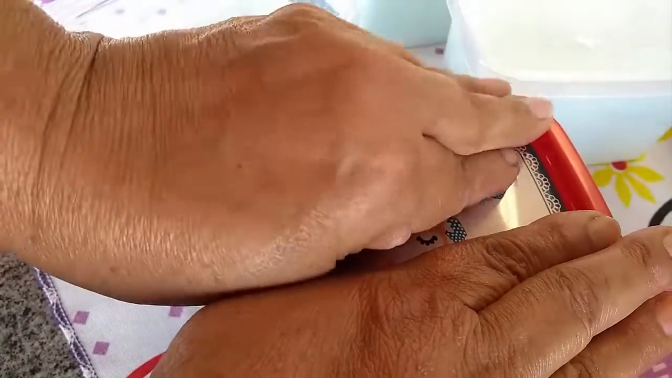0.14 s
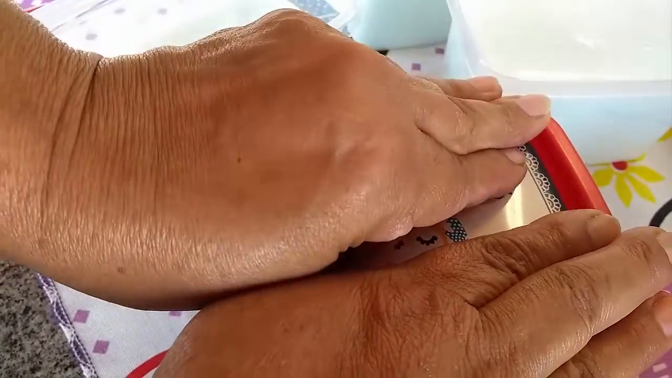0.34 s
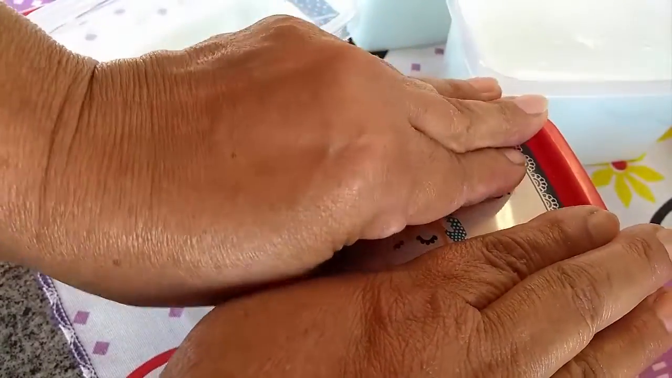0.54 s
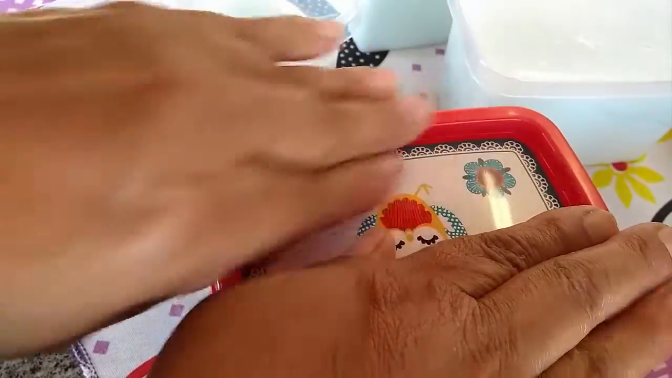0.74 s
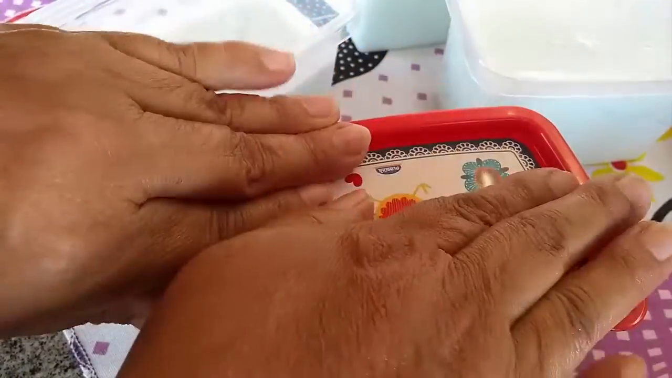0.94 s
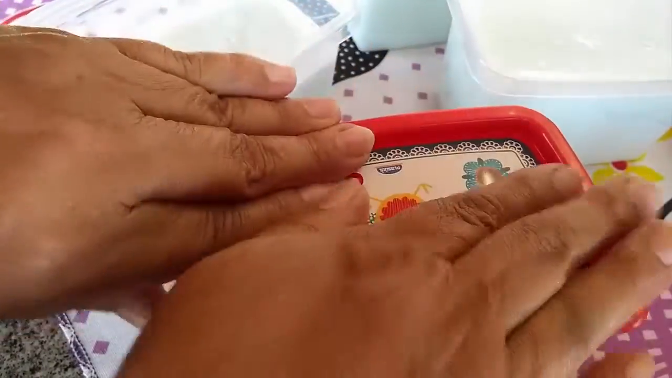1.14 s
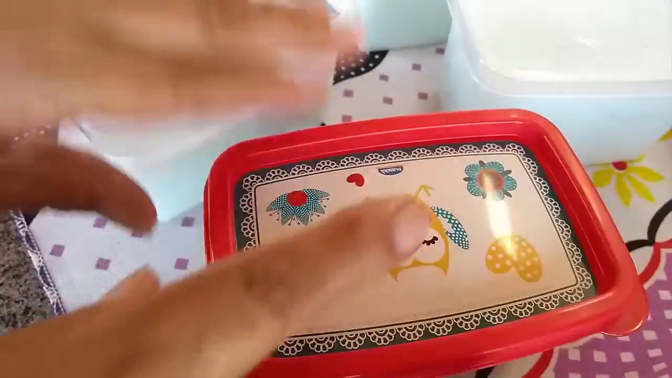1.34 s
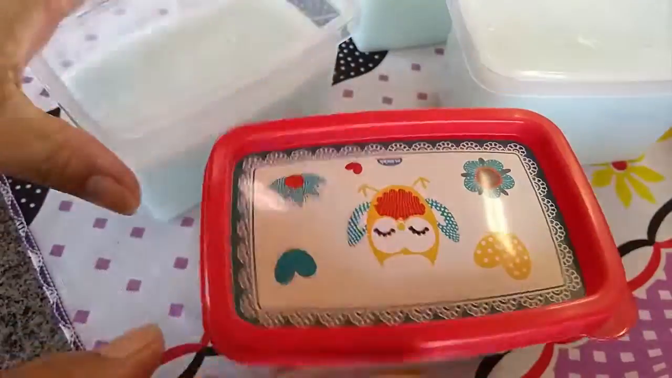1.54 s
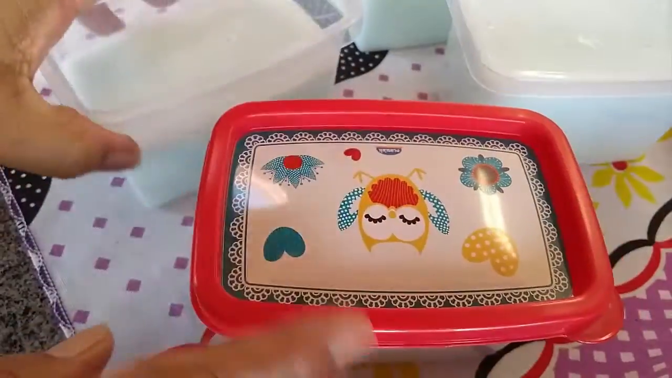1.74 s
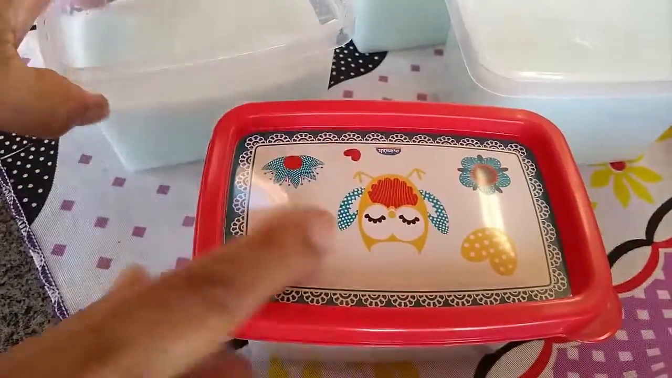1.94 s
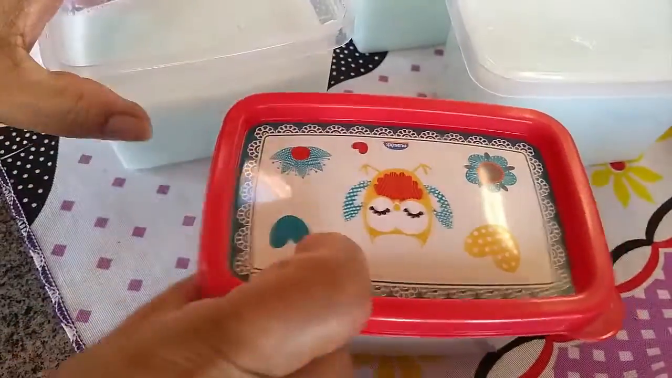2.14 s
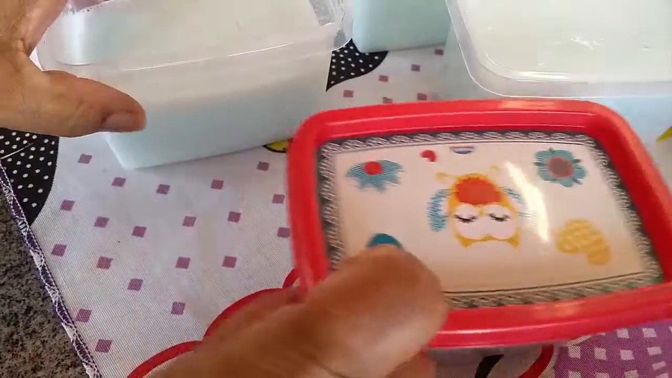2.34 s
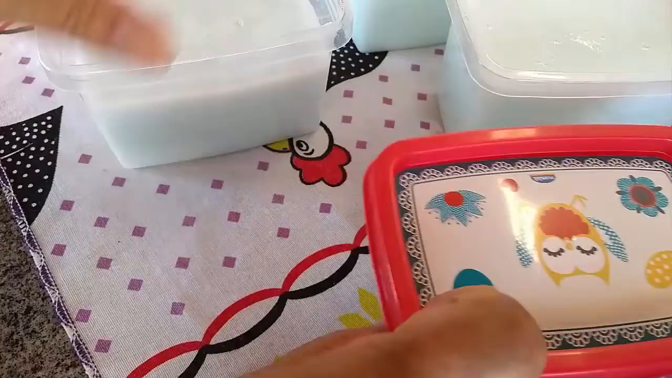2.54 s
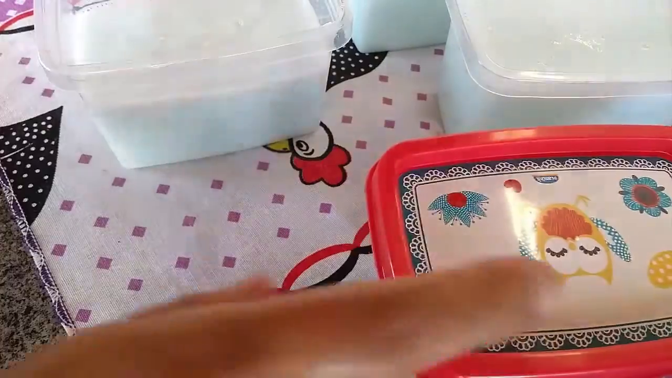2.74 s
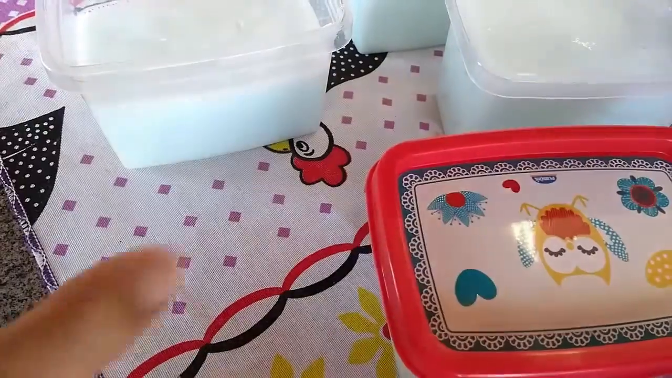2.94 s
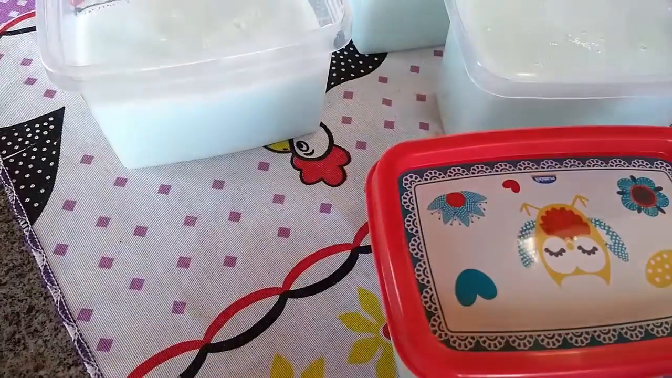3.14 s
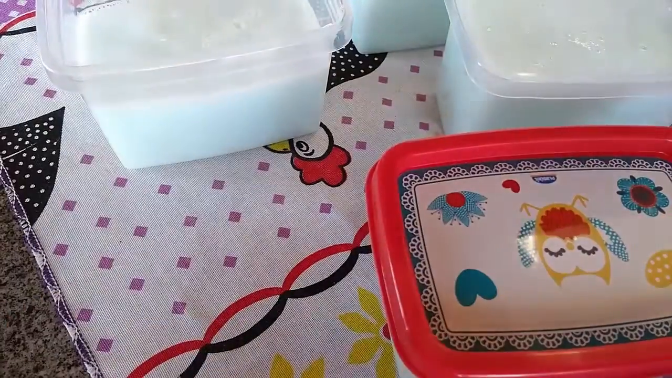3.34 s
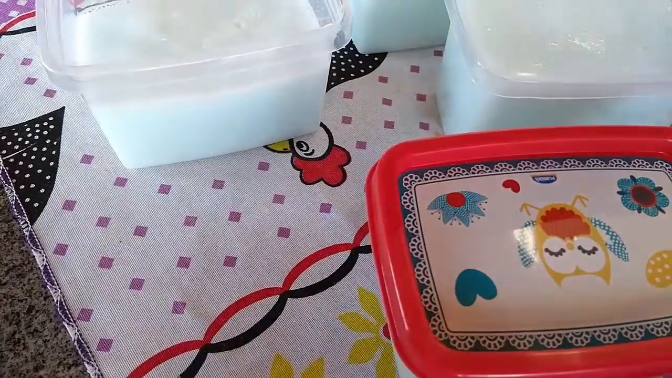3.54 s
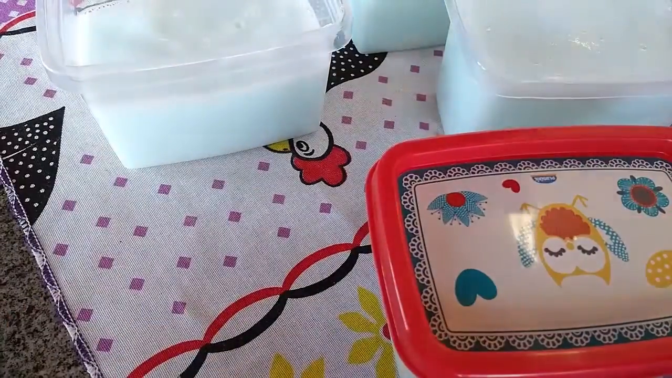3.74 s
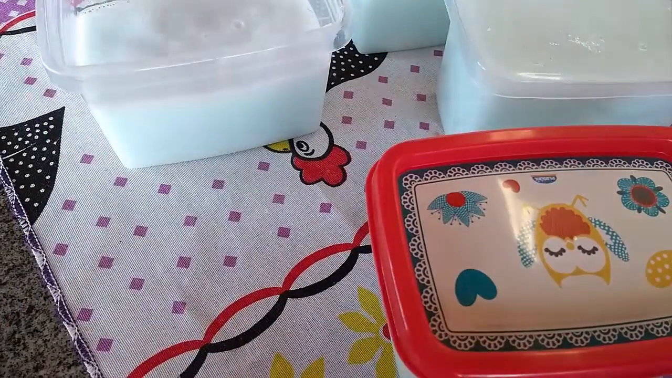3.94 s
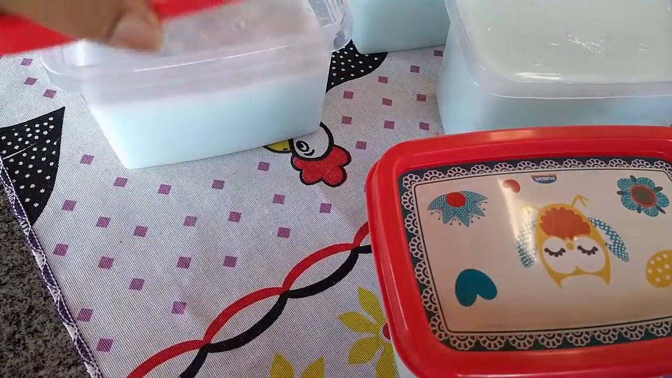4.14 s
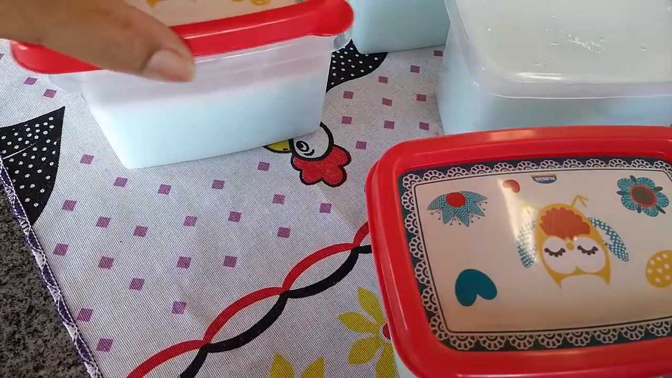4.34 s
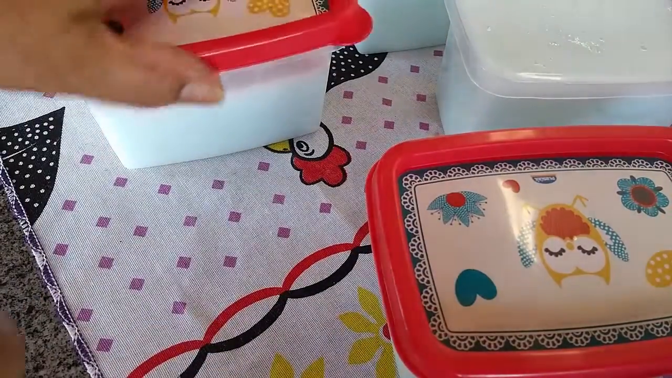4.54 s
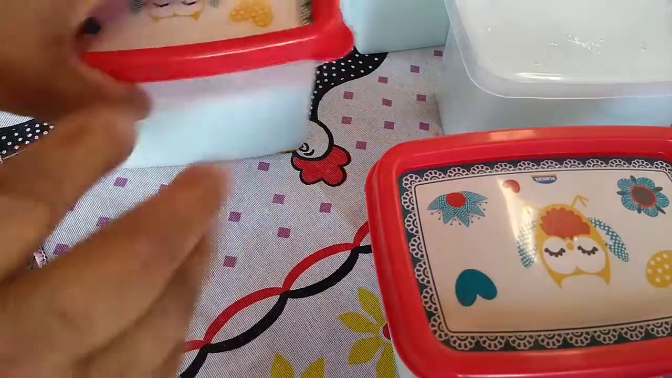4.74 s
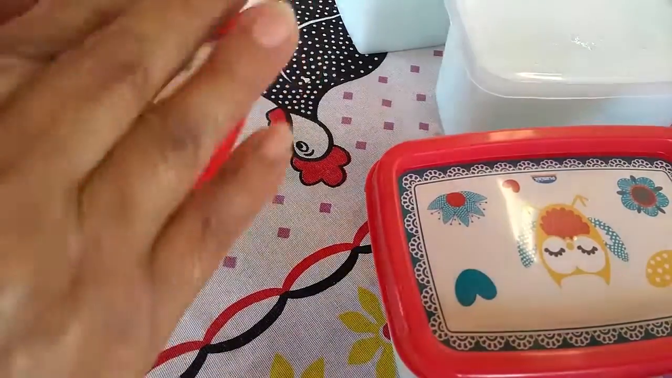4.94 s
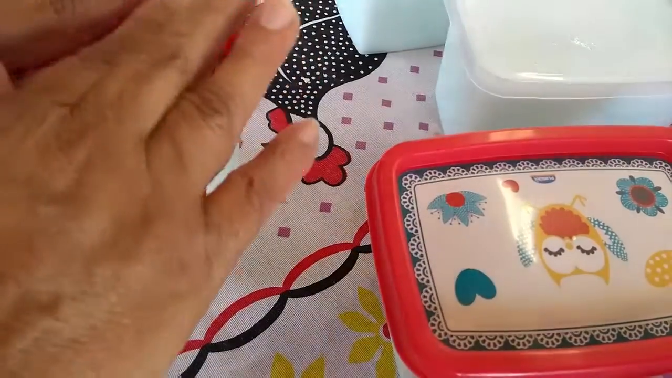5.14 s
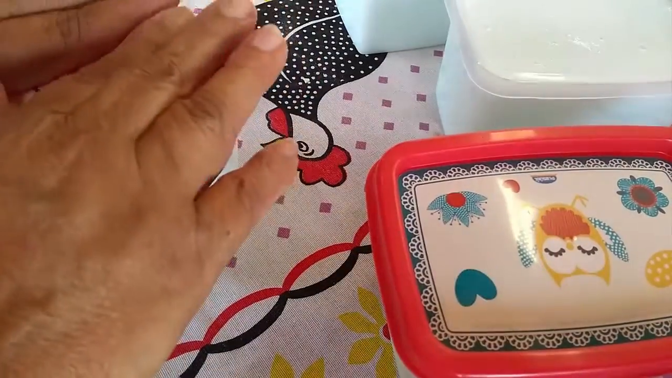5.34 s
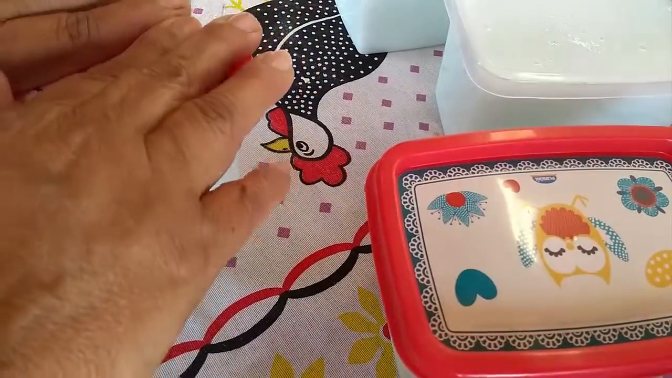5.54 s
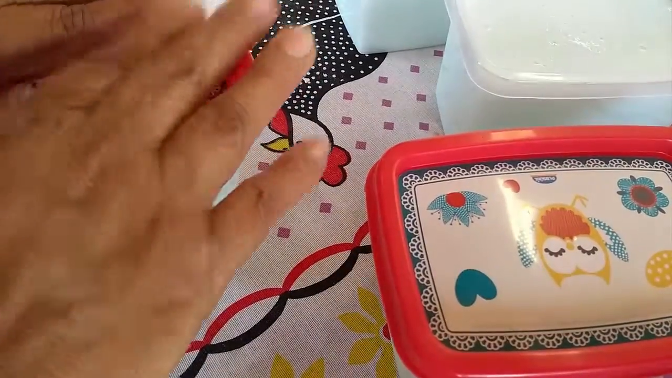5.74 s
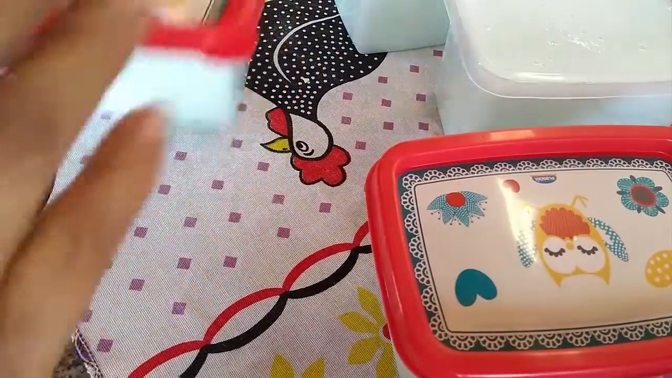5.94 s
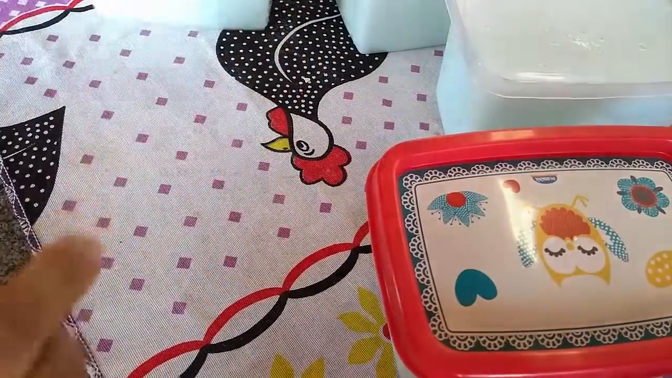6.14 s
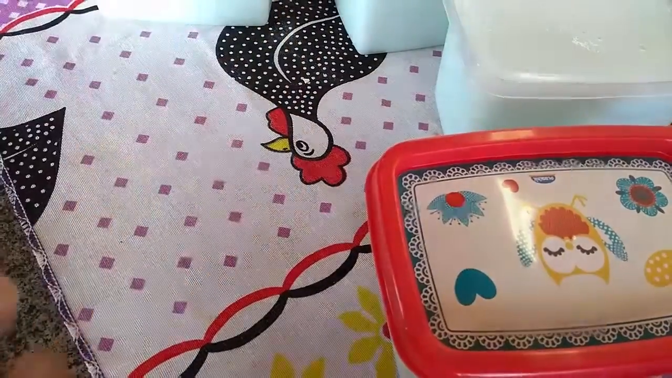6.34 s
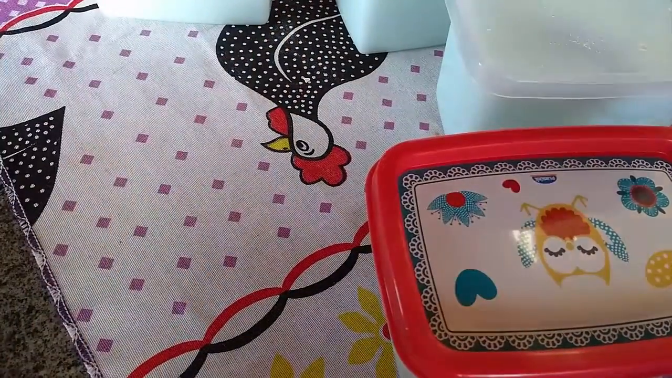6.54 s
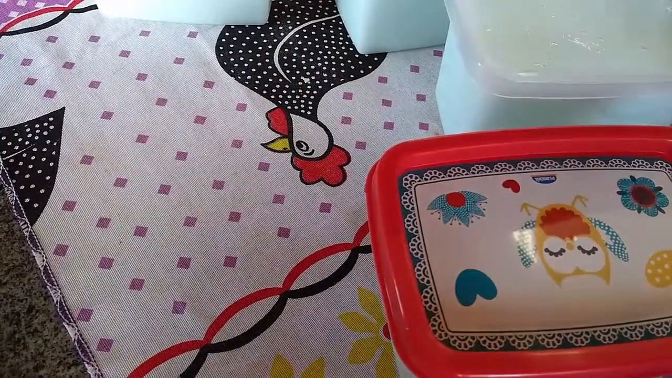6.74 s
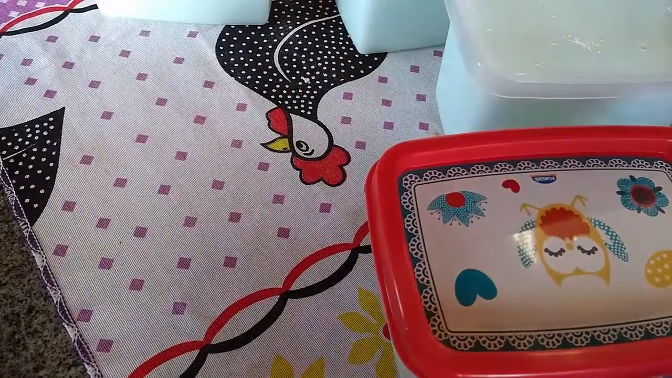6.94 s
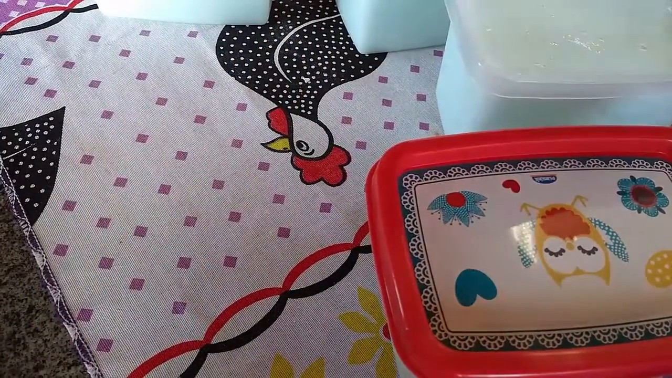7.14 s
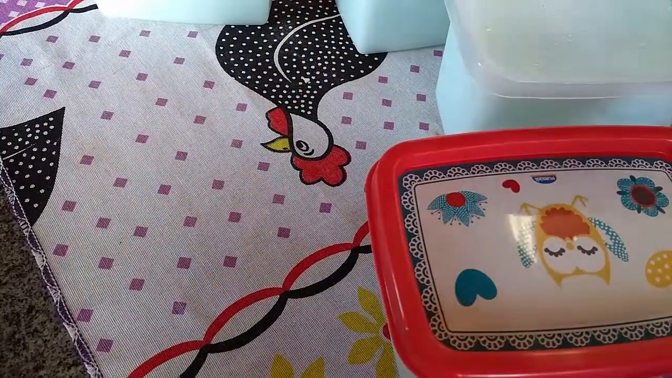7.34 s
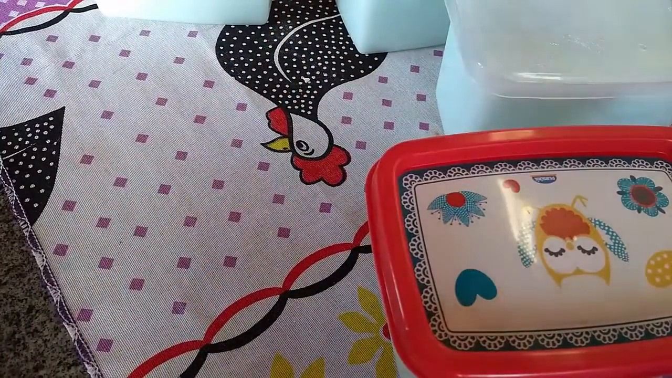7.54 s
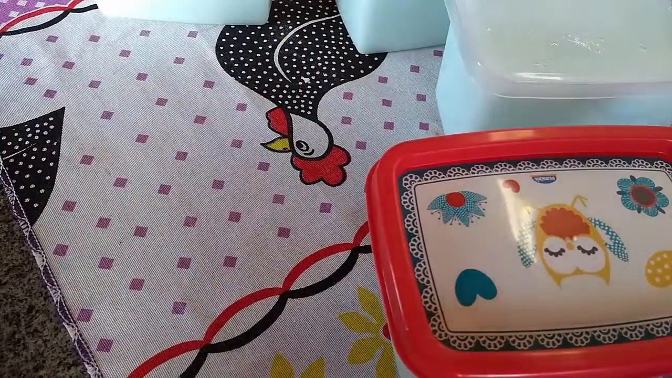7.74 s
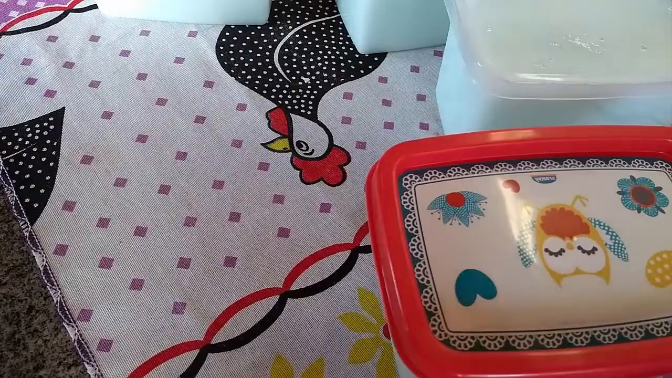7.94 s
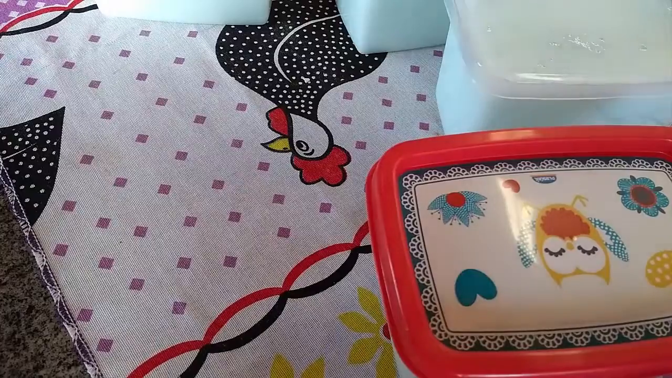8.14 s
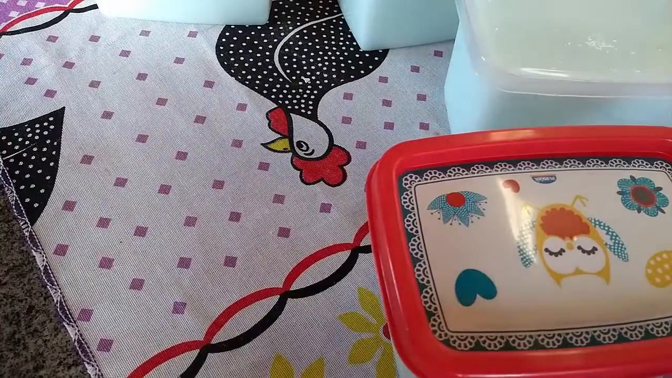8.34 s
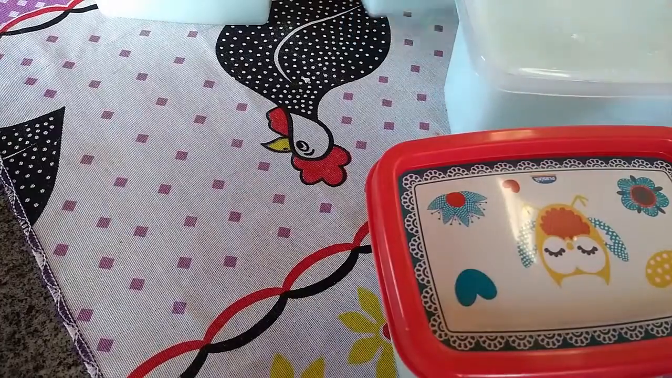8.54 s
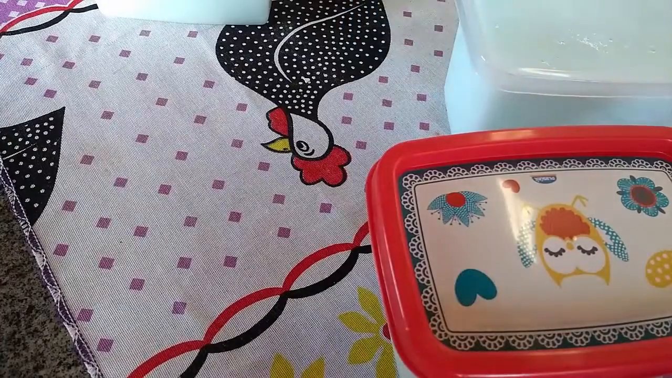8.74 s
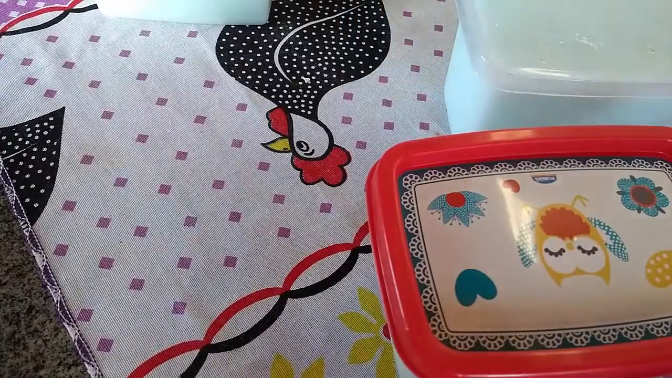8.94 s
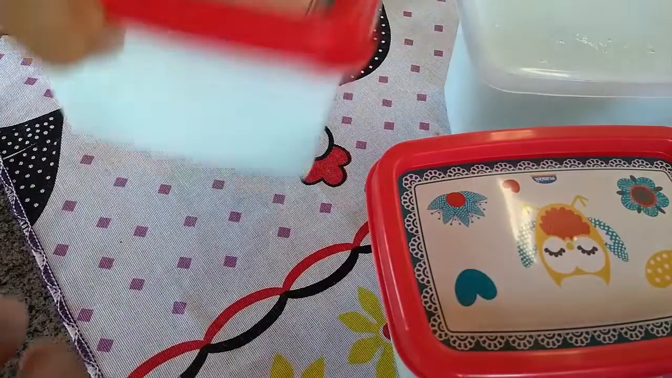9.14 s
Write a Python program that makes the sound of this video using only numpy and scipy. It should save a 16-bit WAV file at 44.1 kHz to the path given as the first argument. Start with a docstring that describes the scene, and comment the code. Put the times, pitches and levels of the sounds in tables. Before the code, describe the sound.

Close to a phone in a small room, a plastic lid clicks and snaps sharply onto a filled tub within the first half second. Light clicks and skin rubs follow, then a hard clack as the tub is put aside. After a lull, another lid is knocked into place, thumps and snaps loudly, then the tub is set down softly. Sparse ticks and scuffs end it over low outdoor rumble and a far engine drone.

```python
"""At a cloth-covered table in a small room, hands press plastic lids onto filled tubs close to a phone.
Each rim creaks over its lip and snaps home: a burst of force rings decaying modes of tub, lid, lip and rim.
Clicks and soft thumps ring the same parts; fingers rub the lids and dry scuffs hiss, as shaped noise with tiny catches.
Behind lie a noise rumble from outdoors, a far engine's drone and thin whine, and a separate electric hum, all wavering tones.
The phone turns its gain down after loud sounds, widens its stereo image and cuts the top of the treble."""
import sys
import numpy as np
from scipy import signal
from scipy.fft import rfft, irfft, next_fast_len
from scipy.io import wavfile
from scipy.ndimage import uniform_filter1d, minimum_filter1d, map_coordinates

SR = 44100
rng = np.random.default_rng(int(sys.argv[2]) if len(sys.argv) > 2 else 0)


def digitize_waveform(pressure):
    """Quantize a signal to 16-bit integers and store it at the path in sys.argv[1].

    Rows of a 2-D input are taken as channels; values are limited to [-1, 1].
    """
    field = np.atleast_2d(pressure).T
    bounded = np.clip(field, -1, 1)
    quanta = np.round(bounded * 32767).astype(np.int16)
    wavfile.write(sys.argv[1], SR, quanta)


N = 409688
T = np.arange(N) / SR  # s

# Where the hands work before the phone. Each row: time in seconds, lead of the left port in ms,
# left minus right in dB before each sound's shadow factor, room send in dB before any extra for the source.
PLACE = [(.6, -0.19, 3.5, -4), (2.6, -0.048, -1.5, -1.5), (3.2, 0.046, -0.5, -1.5), (4.4, 0.051, 2, -1),
         (5.2, 0.18, 2.5, -1), (6.3, 0.18, 2.5, -1.5), (6.9, 0.056, 1, -1)]
# Modes of the lid panel. Each row: multiple of its main pitch before detuning, relative level in dB,
# t60 in seconds before the stretch of each kind of contact.
LID_MODES = [(.53, -6.5, 0.014), (.76, -9.5, 0.018), (1, 2, 0.013), (1.17, -17, 0.0059), (1.45, -12, .012),
             (1.9, -8, 0.0063)]
# Modes of the stiff rim. Each row: as for the lid panel.
RIM_MODES = [(.86, 3.5, 0.0079), (1, 6, 0.0064), (1.18, -14, 0.014), (1.7, -13.5, 0.0046)]
RIM_HZ = 3590  # main pitch of the rim in rubs, scuffs and thumps


def undb(db):
    """Decibels to gain."""
    return 10 ** (np.asarray(db) / 20)


def unit(x):
    """Scale to rms 1."""
    return x / np.sqrt(np.mean(x ** 2) + 1e-24)


def curves(table, t):
    """The columns of a table of (s, values), interpolated at times t."""
    s, *columns = np.transpose(table)
    return [np.interp(t, s, column) for column in columns]


def gains(points, hz):
    """Gain at each frequency from (Hz, dB) points, interpolated along log frequency."""
    point_hz, db = np.transpose(points)
    return undb(np.interp(np.log(hz + 1), np.log(point_hz), db))


def colour(x, points):
    """Filter by a spectrum of (Hz, dB) points."""
    n = next_fast_len(x.shape[-1])
    spectrum = rfft(x, n) * gains(points, np.fft.rfftfreq(n, 1 / SR))
    return irfft(spectrum, n)[..., :x.shape[-1]]


def cut(x, hz, kind, order=2):
    """Causal low- or high-pass."""
    return signal.sosfilt(signal.butter(order, hz, kind, fs=SR, output="sos"), x)


def fade(t, t60):
    """Exponential decay, 60 dB down after t60 seconds."""
    return np.exp(-np.log(1000) * t / t60)


def walk(n, rate):
    """Smooth random wander with a spread near 1, drawn rate times a second."""
    k = max(int(SR / rate), 1)
    steps = np.repeat(rng.standard_normal(n // k + 2), k)
    return unit(uniform_filter1d(steps, k))[:n]


def tone(run, partials, sag, drift, waver_db):
    """A wavering line with (multiple, dB) partials: it builds up, holds and dies away; pitch may sag with its effort."""
    release_s = 0.29
    start, end, rise, hz, db = run
    effort = np.clip((T - start) / rise, 0, 1) * np.clip(1 - (T - end) / release_s, 0, 1)
    pitch = hz * (1 - sag * (1 - effort)) * (1 + drift * walk(N, 9.9))
    phase = 2 * np.pi * np.cumsum(pitch) / SR
    wave = sum(undb(partial_db) * np.sin(k * phase) for k, partial_db in partials)
    return unit(wave) * effort * undb(db + waver_db * walk(N, 8.8))


def background(flutter_db=1.5):
    """Soft outdoor rumble, alike at both ports in the middle range, under a smooth hiss."""
    # Slow swell of the rumble. Each row: time in seconds, mean level in dB.
    swell = [(0, -57.5), (2.5, -54.5), (4.1, -55), (8.2, -54), (8.9, -58)]
    # Colour of the noise. Each row: frequency in Hz, relative level in dB per Hz.
    air_colour = [(25, -30), (50, -5.5), (85, 3), (180, 0), (265, 6), (400, -1.5), (900, -8), (1500, -12.5),
                  (2500, -19.5), (5000, -26), (9000, -31), (14000, -34), (15000, -68)]
    hiss_db = -11.5  # relative to the rumble
    level_db, = curves(swell, T)
    mid, side = colour(rng.standard_normal((2, N)), air_colour)
    side = colour(side, [(60, -3.0), (130, -2.0), (290, -8.5), (1400, 2.5), (3000, 0)])
    air = mid + side * np.array([[1], [-1]])
    rumble = unit(cut(air, 2130, "low", order=4)) * undb(flutter_db * walk(N, 10))
    hiss = unit(cut(air, 2600, "high", order=4)) * undb(hiss_db)
    return undb(level_db) * (rumble + hiss)


def electric_hum():
    """A steady electric hum on the second and third multiples of its base pitch, stronger at the right port."""
    # One row: start in seconds, start of the dying away in seconds, time to full level in seconds,
    # base pitch in Hz (itself silent), level in dB before waver and pan.
    hum_run = (4.98, 6.45, .05, 60.8, -57.5)
    return tone(hum_run, [(2, 0), (3, -1)], sag=0, drift=.003, waver_db=1) * undb([[-1.5], [1.5]])


def far_engine():
    """A far engine: a low drone that sags in pitch with its effort, and a thin blurred whine."""
    # Pulls of the drone. Each row: start in seconds, start of the dying away in seconds,
    # time to full effort in seconds, pitch at full effort in Hz, level in dB before waver and pan.
    pulls = [(-.2, .55, 0.19, 149.5, -63), (2.8, 4.59, 1.41, 142.6, -53), (7.598, 8.41, 0.425, 144, -66)]
    # Whine, one row with the same columns.
    whine_run = (3.62, 4.22, .3, 916, -67.5)
    sag = .045  # share of pitch lost at no effort
    drone = sum(tone(pull, [(1, -2), (2, -22.5)], sag, drift=0.0027, waver_db=-0.5) for pull in pulls)
    whine = tone(whine_run, [(1, 0)], sag=0, drift=.002, waver_db=1)
    whine = whine * (1 + .3 * walk(N, 45))  # fast flutter blurs the line
    return drone * undb([[-1.5], [1.5]]) + whine


def room(dry):
    """Quick reflections from table, hands and tubs, then the tail of the room, all as decaying noise."""
    near_t60_s, near_db = 0.037, -11
    tail_t60_s, tail_top_t60_s, tail_db = 0.29, 0.26, -12.5
    t = np.arange(SR // 2) / SR
    near, far, shared = rng.standard_normal((3, 2, len(t)))
    near = near * fade(t, near_t60_s) * (t > .003)
    # the long waves reach both ports partly alike
    low = cut(shared[0] + .5 * far, 1230, "low") * fade(t, tail_t60_s)
    high = undb(1.5) * cut(far, 2900, "high") * fade(t, tail_top_t60_s)
    tail = (low + high) * (t > .008)
    response = (undb(near_db) * unit(near) + undb(tail_db) * unit(tail)) / np.sqrt(len(t))
    return signal.fftconvolve(dry, response, axes=1)[:, :N]


def add(out, x, start, shadow=1):
    """Place a sound before the two ports: the lead and level difference of its spot set its side."""
    lead_ms, pan_db, _ = curves(PLACE, start)
    for channel, side in enumerate((.5, -.5)):
        i = max(int((start - side * lead_ms / 1000) * SR), 0)
        out[channel, i:i + len(x)] += x[:N - i] * undb(side * pan_db * shadow)


def ring(modes, hz, stretch=1):
    """Ring of a struck part as decaying cosines, each mode slightly detuned at random."""
    detune = .025  # spread, as a share of pitch
    multiple, db, t60 = np.transpose(modes)[:, :, None]
    t = np.arange(SR // 6) / SR
    pitch = hz * multiple * (1 + detune * rng.standard_normal(multiple.shape))
    return np.sum(undb(db) * np.cos(2 * np.pi * pitch * t) * fade(t, t60 * stretch), axis=0)


def friction(table, catches_per_s, catch_db, uneven_db, stretch, taper):
    """Dense tiny slips and coarser catches shake lid and rim and hiss; pressure and pitch shift as the hand slides."""
    # Colour of the sliding hiss. Each row: frequency in Hz, relative level in dB.
    hiss_colour = [(1200, -30), (2400, 8), (3500, 2.5), (6000, 4), (9000, -0.5), (13000, 0.5), (16000, -23)]
    pitch_wander = 0.0707  # spread, as a share of the lid's pitch
    out = np.zeros((2, N))
    for s, length, lid_db, lid_hz, hiss_db, rasp_db in table:
        n = int(max(length, .01) * SR)
        count = int(n / SR * catches_per_s) + 1
        at = (np.arange(count) + rng.random(count)) * (n - 1) / count
        catches = np.zeros(n)
        catches[at.astype(int)] = rng.uniform(-1, 1, count)
        slips = rng.standard_normal(n) + undb(catch_db) * unit(catches)
        slips *= signal.windows.tukey(n, taper) * undb(uneven_db * walk(n, 71.0))
        slips = np.pad(slips, (0, SR // 50))  # room for the lid to ring out

        body = signal.fftconvolve(slips, ring(LID_MODES, lid_hz, stretch))[:len(slips)]
        body = cut(body, 1.9 * lid_hz, "low", order=4)
        # reading at a wandering speed bends the pitch
        body = map_coordinates(body, [np.cumsum(1 + pitch_wander * walk(len(slips), 60))])
        body = cut(body, 240, "high")
        rasp = signal.fftconvolve(slips, ring(RIM_MODES, RIM_HZ, stretch))[:len(slips)]
        rasp = cut(rasp, 1750, "high")
        hiss = colour(slips, hiss_colour)
        rub = undb(lid_db) * unit(body) + undb(hiss_db) * unit(hiss) + undb(rasp_db) * unit(rasp)
        add(out, rub * np.sqrt(n / len(slips)), s)
    return out


def rubs():
    """Skin grips and makes the lid sound; a dry scuff is mostly hiss, and rasps where it catches the rim."""
    # Skin rubbing a lid. Each row: start in seconds, length in seconds (10 ms at least is played),
    # lid level in dB before pan and gain, lid pitch in Hz before it wanders.
    skin_rows = [(0, 0.0099, -51.5, 1180), (0.139, 0.13, -59.5, 1750), (0.66, 0.07, -60.5, 1740),
                 (0.84, 0.07, -56, 1470), (2.186, 0.19, -58.5, 1040), (3.224, 0.0092, -55, 1750),
                 (4.421, 0.066, -48, 670), (4.538, .15, -58, 750), (5.151, 0.067, -54, 900),
                 (5.28, 0.039, -48, 850), (5.368, 0.16, -57, 825), (6.257, 0.07, -53, 910),
                 (6.941, .016, -51, 1340), (6.975, 0.079, -56, 950), (8.044, 0.26, -59, 1040)]
    # Dry scuffs over cloth and plastic. Each row: start in seconds, length in seconds,
    # hiss level in dB and rim rasp level in dB, both before pan and gain.
    scuff_rows = [(1.487, 0.051, -55.5, -58), (1.921, 0.045, -60.5, -76), (1.955, 0.03, -54.5, -60),
                  (2.22, 0.19, -80, -73), (2.379, 0.28, -66.5, -92), (4.402, 0.14, -65, -80),
                  (4.605, 0.094, -62, -59), (6.965, 0.087, -69, -63.5), (7.263, 0.017, -57, -61),
                  (7.432, 0.068, -65, -73), (7.54, 0.015, -59, -67), (8.035, 0.081, -63, -93),
                  (8.16, 0.16, -66.5, -83), (8.301, 0.018, -57.5, -79)]
    skin_hiss_db, skin_rasp_db = -14.5, -24.5  # relative to the lid
    scuff_lid_hz, scuff_lid_db = 1070, -1.5  # level relative to the hiss
    skin = [(s, length, db, hz, db + skin_hiss_db, db + skin_rasp_db) for s, length, db, hz in skin_rows]
    dry_scuffs = [(s, length, db + scuff_lid_db, scuff_lid_hz, db, rasp_db)
                  for s, length, db, rasp_db in scuff_rows]
    return (friction(skin, catches_per_s=170, catch_db=8, uneven_db=3, stretch=0.78, taper=0.15)
            + friction(dry_scuffs, catches_per_s=400, catch_db=-2.5, uneven_db=3.5, stretch=0.16, taper=0.54))


def contact(slip_ms, slip_db, creak_db, creak_ms, count=9):
    """The edge creaks, slips ever harder and lets go; returns the force and the index of its release."""
    release = SR // 80
    before_ms = (release - np.arange(release + 1)) * 1000 / SR
    creak = rng.standard_normal(release + 1) * np.exp(-before_ms / creak_ms)
    push = undb(creak_db) * creak / np.linalg.norm(creak)
    early = (np.arange(count) + rng.uniform(0.25, 1, count)) / count  # share of slip_ms before the release
    at = np.clip(release - (early * slip_ms * SR / 1000).astype(int), 0, release)
    push[at] += undb(slip_db) * (1.3 - early) * rng.choice([-1, 1], count) / np.sqrt(count)
    push[release] += 1
    return push, release


def blow(x, db):
    """Set the level of a short sound: its whole energy as rms over 10 ms."""
    return x * undb(db) / np.sqrt(np.sum(x ** 2) / (SR // 100))


def strikes(table, slip_ms, slip_db, creak_db, creak_ms, stretch, tick_t60, buzz_db):
    """Each contact rings tub, lid, lip and rim; the loose lid buzzes briefly against the lip."""
    # Modes of a filled tub on the table. Each row: multiple of the thud pitch before detuning,
    # relative level in dB, t60 in seconds.
    tub_modes = [(.66, -13, 0.16), (1, 2.5, 0.03), (1.35, 0.5, 0.024), (1.75, -5.5, 0.014)]
    # Modes of the tub's lip, flicked by the rim. Each row: multiple of its main pitch before detuning,
    # relative level in dB, t60 in seconds.
    lip_modes = [(.85, -16, 0.0056), (1, 4, 0.008), (1.3, 0, 0.0082)]
    # Colour of the sharp edge contact. Each row: frequency in Hz, relative level in dB.
    tick_colour = [(3000, -17), (4500, -1), (6300, 3.5), (8500, 3.5), (11000, -7), (14000, -2.5),
                   (16000, -19)]
    out = np.zeros((2, N))
    t = np.arange(SR // 6) / SR
    for s, thud_db, thud_hz, lid_db, lid_hz, lip_db, lip_hz, rim_db, rim_hz, tick_db in table:
        push, release = contact(slip_ms, slip_db, creak_db, creak_ms)
        buzz = rng.standard_normal(len(t)) * fade(t, 0.0052)
        buzz = np.pad(buzz, (release + 1, 0)) / np.linalg.norm(buzz)
        push = np.pad(push, (0, len(t))) + undb(buzz_db) * buzz

        # each part keeps to its own band
        tub = cut(ring(tub_modes, thud_hz), 1.9 * thud_hz, "low", order=3)
        tub = cut(tub, .5 * thud_hz, "high", order=4)
        lid = cut(ring(LID_MODES, lid_hz, stretch), 1.47 * lid_hz, "low", order=4)
        lid = cut(lid, 0.61 * lid_hz, "high", order=3)
        lip = cut(ring(lip_modes, lip_hz), 1.03 * lip_hz, "low", order=4)
        lip = cut(lip, 0.88 * lip_hz, "high", order=4)
        rim = cut(ring(RIM_MODES, rim_hz, stretch), 0.88 * rim_hz, "high", order=3)
        rim = cut(rim, 1.26 * rim_hz, "low", order=3)
        tub, lid, lip, rim = (signal.fftconvolve(part, push) for part in (tub, lid, lip, rim))

        # the tick is noise that follows the force and dies away after it
        scraping = np.sqrt(np.abs(signal.fftconvolve(fade(t, tick_t60) ** 2, push ** 2)))
        tick = colour(rng.standard_normal(len(scraping)) * scraping, tick_colour)
        start = s - release / SR
        plastic = blow(lid, lid_db) + blow(lip, lip_db) + blow(rim, rim_db) + blow(tick, tick_db)
        add(out, blow(tub, thud_db), start, shadow=2.2)
        add(out, plastic, start, shadow=1.0)
    return out


def knocks():
    """Hard clicks ring lid and rim; soft thumps mostly shake the filled tub."""
    # Light clicks of plastic on plastic. Each row: time in seconds, lid level in dB, lid pitch in Hz,
    # rim crack level in dB, rim pitch in Hz, edge tick level in dB; levels before pan and gain.
    click_rows = [(0.107, -50, 586, -69, 3400, -81), (0.4842, -29, 704, -53, 3350, -43),
                  (0.922, -60, 1000, -54, 3280, -72), (1.0068, -57.5, 1110, -56, 3080, -75),
                  (1.2369, -52.5, 1350, -45, 3070, -68), (1.4974, -57, 1100, -48, 4060, -66),
                  (2.065, -52, 920, -72, 3200, -76), (2.097, -60, 1100, -78, 3200, -78),
                  (2.685, -61, 1090, -68, 3200, -76), (3.2309, -37, 1096, -43, 2880, -56),
                  (3.2331, -34.5, 910, -39, 2920, -47.5), (3.2455, -38.5, 1110, -41, 3400, -54),
                  (3.3309, -57, 1300, -58, 3300, -68), (3.3448, -54, 1270, -43.5, 3100, -58),
                  (3.347, -47, 1100, -43, 3050, -61), (3.3815, -48.5, 930, -49.5, 3220, -67),
                  (4.3153, -49.5, 1080, -49.5, 4230, -58), (4.3287, -36.5, 986, -49.5, 4200, -51.5),
                  (4.411, -51, 990, -66, 4400, -56.5), (4.49, -44, 760, -58, 4270, -66),
                  (4.4948, -29.5, 710, -45.5, 4250, -51.5), (4.5025, -43, 780, -50, 3570, -53),
                  (4.5255, -46, 786, -57, 3320, -66), (5.1167, -50.5, 685, -54.5, 4180, -69),
                  (5.1604, -57, 930, -48.5, 3860, -56.5), (5.1921, -46.5, 785, -53, 3500, -63),
                  (5.295, -38, 805, -59, 3200, -60), (5.322, -47, 900, -53, 3160, -62),
                  (5.408, -40, 895, -35.5, 2980, -52.5), (5.573, -33, 890, -54, 3200, -54),
                  (5.5868, -51, 700, -55, 4170, -45), (6.9624, -39, 905, -49.5, 3030, -64),
                  (7.0607, -43.5, 1140, -49.5, 3034, -59.5), (7.9104, -44, 805, -53, 3250, -54.5),
                  (7.912, -43.5, 1504, -62, 3300, -67), (7.957, -57, 1000, -73.5, 3193, -74),
                  (7.971, -49.5, 1150, -60, 3200, -69), (8.047, -51.5, 975, -63, 3180, -64)]
    # Soft thumps of a palm or a tub set down. Each row: time in seconds,
    # tub thud level in dB before pan and gain, thud pitch in Hz.
    thump_rows = [(4.9785, -39, 310), (5.1742, -41, 322), (6.2248, -35.5, 322), (6.2802, -42.5, 330),
                  (6.295, -48, 500), (6.304, -49.5, 584)]
    click_thud_db, click_thud_hz = -11, 266  # level relative to the lid
    thump_lid_hz, thump_lid_db, thump_rim_db, thump_tick_db = 620, -22, -24.5, -36  # levels relative to the thud
    lip_db, lip_hz = -6, 2060  # level relative to the rim crack
    rows = []
    for s, lid_db, lid_hz, rim_db, rim_hz, tick_db in click_rows:
        rows.append((s, lid_db + click_thud_db, click_thud_hz, lid_db, lid_hz,
                     rim_db + lip_db, lip_hz, rim_db, rim_hz, tick_db))
    for s, thud_db, thud_hz in thump_rows:
        rim_db = thud_db + thump_rim_db
        rows.append((s, thud_db, thud_hz, thud_db + thump_lid_db, thump_lid_hz,
                     rim_db + lip_db, lip_hz, rim_db, RIM_HZ, thud_db + thump_tick_db))
    return strikes(rows, slip_ms=1.2, slip_db=-4, creak_db=-11, creak_ms=3.0,
                   stretch=1.0, tick_t60=0.0065, buzz_db=-7.5)


def snaps():
    """The rim creaks over the lip and lets go, ringing the whole lid at once."""
    # Rims snapping over the lip. Each row: time in seconds, tub thud level in dB, thud pitch in Hz,
    # lid level in dB, lid pitch in Hz, lip pop level in dB, lip pitch in Hz, rim crack level in dB,
    # rim pitch in Hz, edge tick level in dB; levels before pan and gain.
    snap_rows = [(0.4028, -33.5, 396, -30.5, 723, -25.5, 1870, -28.5, 3350, -42),
                 (0.4862, -30.5, 269, -23.5, 1324, -17.5, 2310, -21, 3580, -35),
                 (5.282, -28.5, 193, -40, 650, -37.5, 2330, -33, 3080, -45),
                 (5.31, -29, 415, -27.5, 800, -29, 2130, -28.5, 3760, -39),
                 (5.4936, -19.5, 204, -24, 580, -30, 2260, -26.5, 3160, -36),
                 (5.5783, -29.5, 306, -20.5, 624, -21.5, 1630, -21.5, 3970, -32.5)]
    return strikes(snap_rows, slip_ms=2.404, slip_db=-4.5, creak_db=-14.5, creak_ms=4.6,
                   stretch=0.75, tick_t60=0.007, buzz_db=-13)


def scene():
    """Snaps, knocks and rubs in the room, over the background, the hum and the far engine."""
    knock_room_db, rub_room_db = 7, 10.5  # extra room; the snaps are nearest to the phone and get none
    snapping, knocking, rubbing = snaps(), knocks(), rubs()
    *_, room_db = curves(PLACE, T)
    send = snapping + undb(knock_room_db) * knocking + undb(rub_room_db) * rubbing
    hands = snapping + knocking + rubbing + room(send * undb(room_db))
    return hands + background() + electric_hum() + far_engine()


def auto_gain(x):
    """A loud sound turns the phone's gain down; it stays down for a moment, then creeps back."""
    threshold_db, range_db = -27, 6.5
    attack_s, hold_s, recover_db_per_s = 0.083, 0.48, 8
    power = uniform_filter1d(np.mean(x ** 2, axis=0), SR // 100)
    over_db = np.clip(10 * np.log10(np.abs(power) + 1e-18) - threshold_db, 0, range_db)
    hold = int(hold_s * SR)
    held_db = -minimum_filter1d(-over_db, hold, origin=(hold - 1) // 2, mode="constant")
    # a running maximum along a falling slope lets the gain back at a steady rate
    recovered_db = recover_db_per_s * T
    duck_db = np.maximum.accumulate(held_db + recovered_db) - recovered_db
    pole = np.exp(-1 / (attack_s * SR))
    return x * undb(-signal.lfilter([1 - pole], [1, -pole], duck_db))


def record(dry):
    """The phone rides its gain, subtracts a delayed share of the other channel to widen the image, and cuts the top."""
    # Share of each channel taken from the other. Each row: frequency in Hz, level in dB.
    crossfeed = [(300, -10), (1300, -2), (2450, -4), (5000, -10), (10000, -15), (16000, -7)]
    delay_ms, top_hz = 0.3987, 15800
    n = next_fast_len(N + SR // 10)
    hz = np.fft.rfftfreq(n, 1 / SR)
    both = rfft(auto_gain(dry), n)
    share = gains(crossfeed, hz)
    delay = np.exp(-2j * np.pi * hz * delay_ms / 1000)
    wide = (both - share * delay * both[::-1]) / np.sqrt(1 + share ** 2)
    top_cut = signal.ellip(8, .2, 70, top_hz, fs=SR, output="sos")
    return signal.sosfilt(top_cut, irfft(wide, n)[:, :N])


dry = scene()
out = record(dry)
digitize_waveform(out)
```